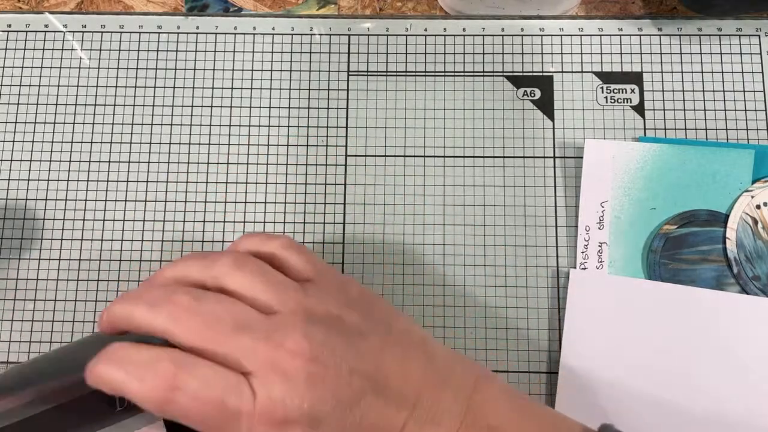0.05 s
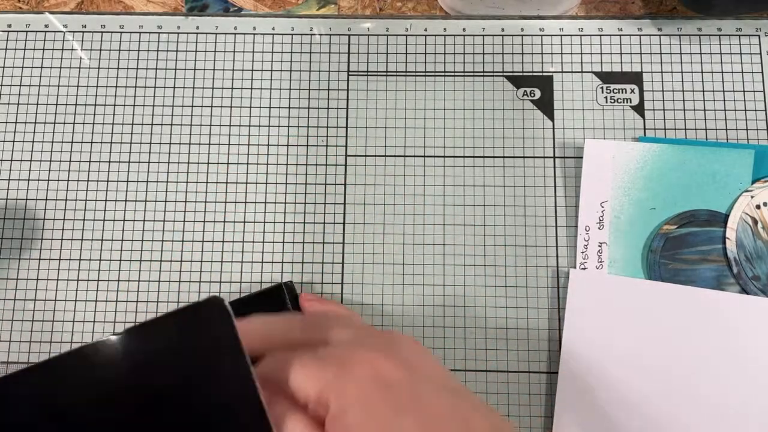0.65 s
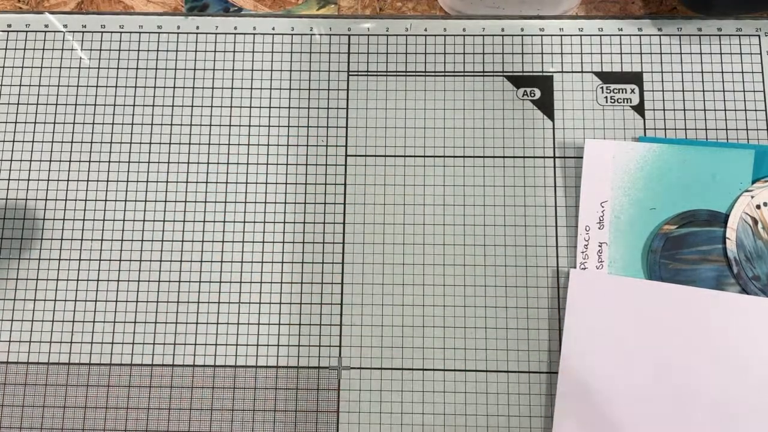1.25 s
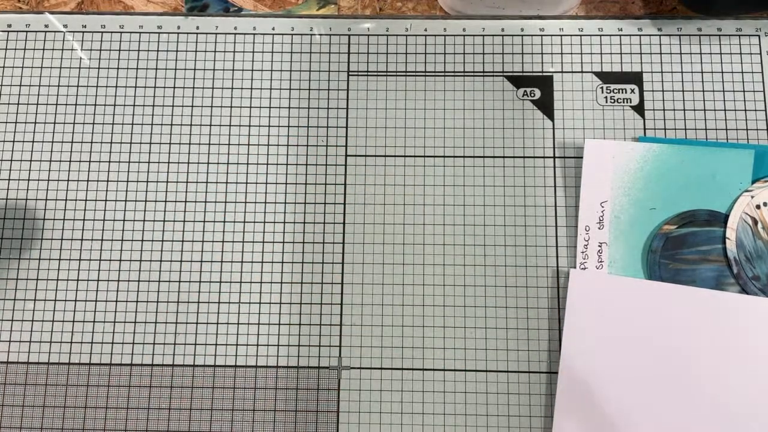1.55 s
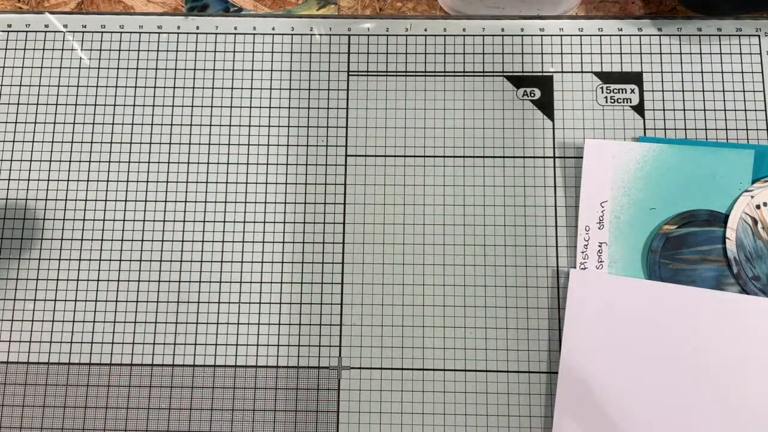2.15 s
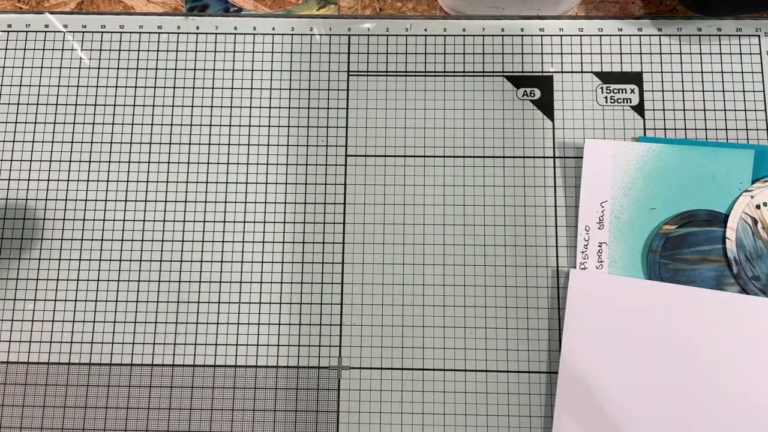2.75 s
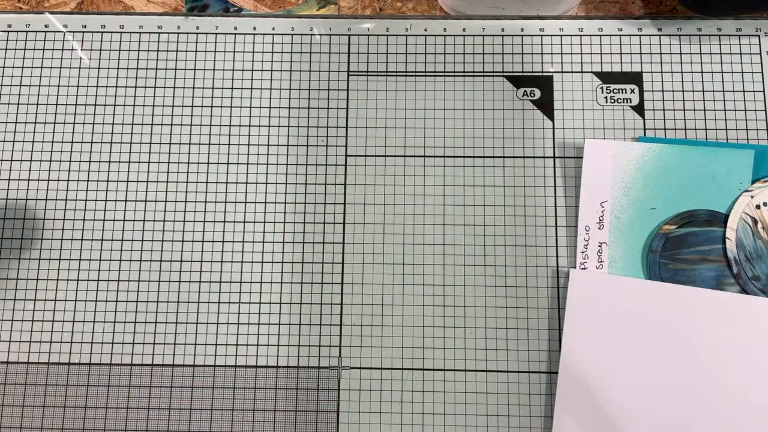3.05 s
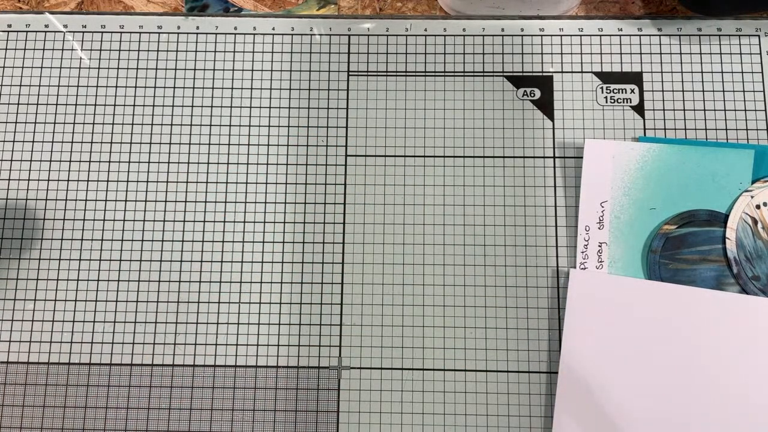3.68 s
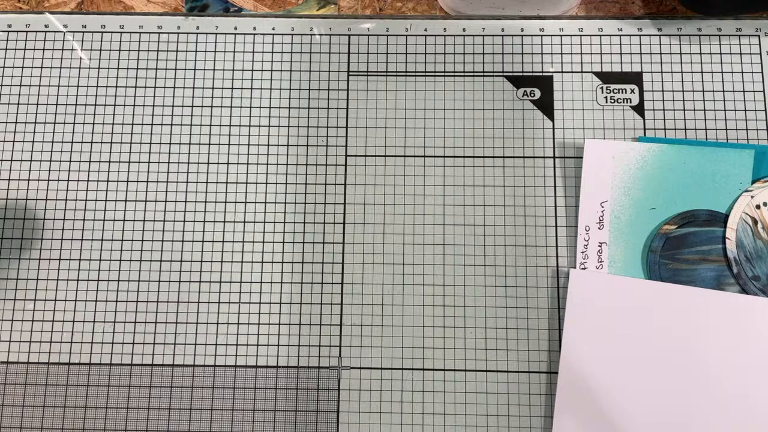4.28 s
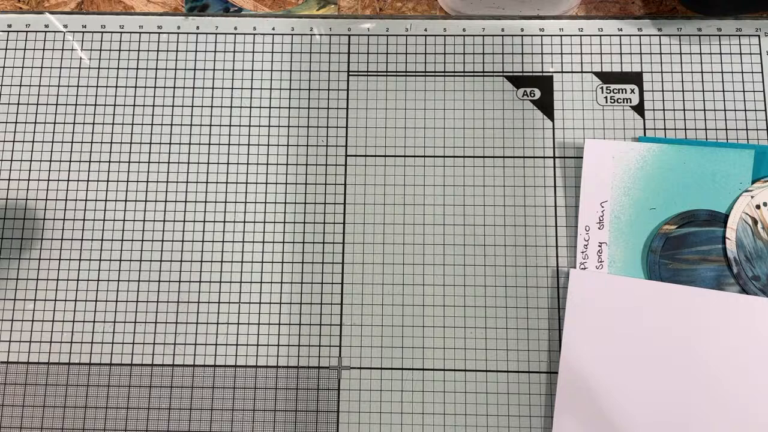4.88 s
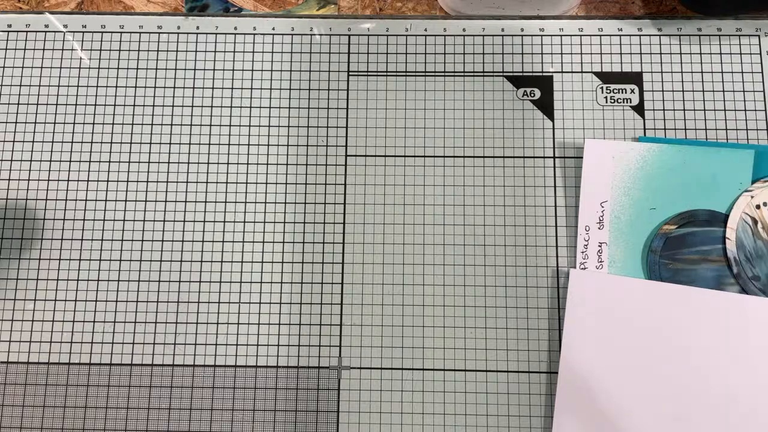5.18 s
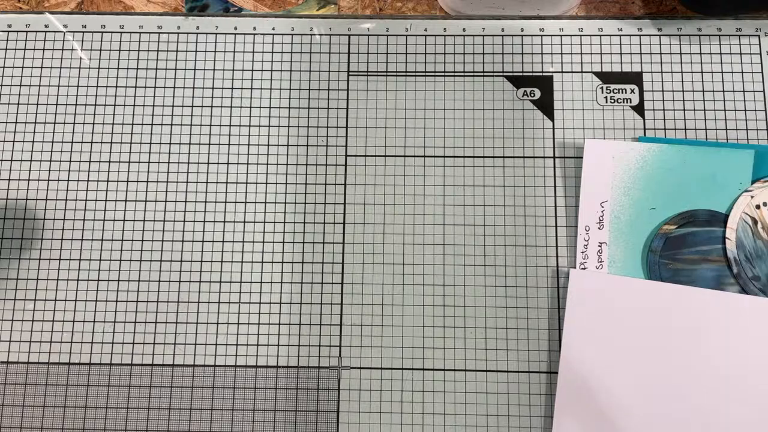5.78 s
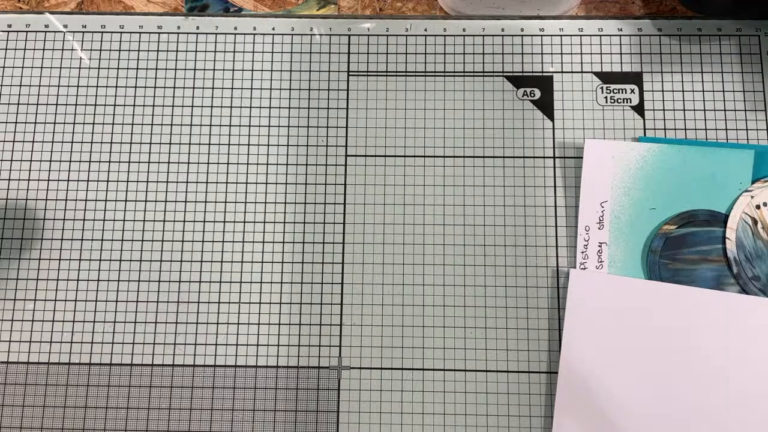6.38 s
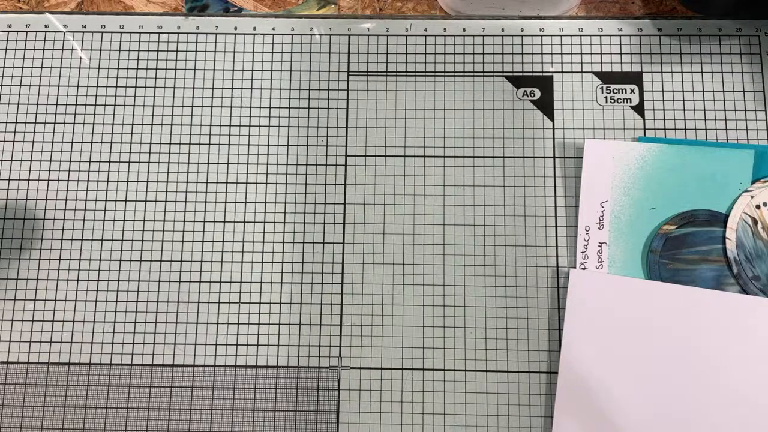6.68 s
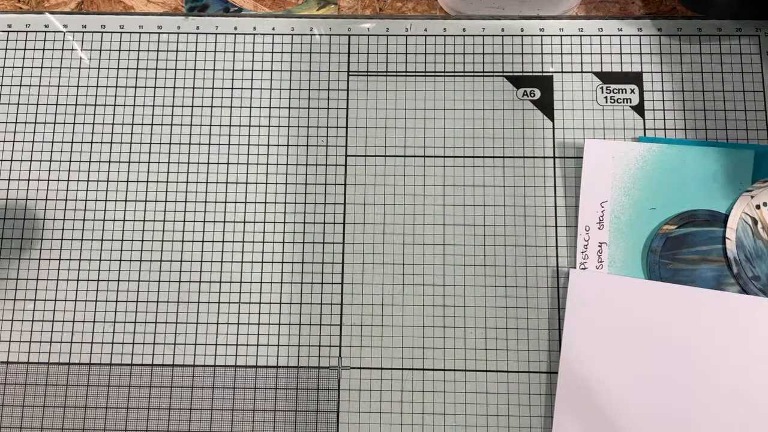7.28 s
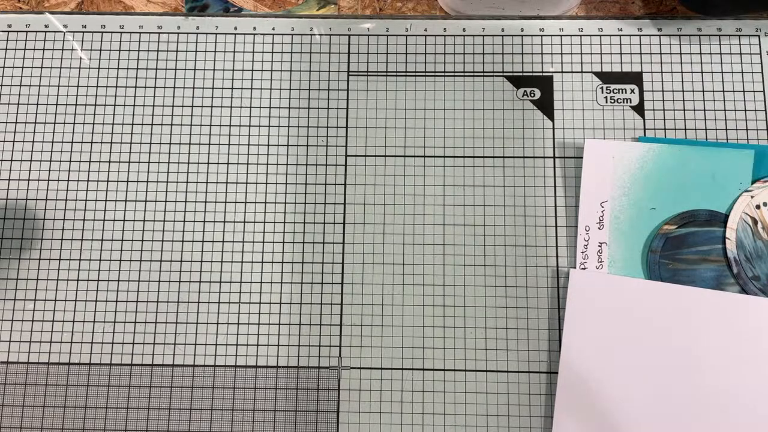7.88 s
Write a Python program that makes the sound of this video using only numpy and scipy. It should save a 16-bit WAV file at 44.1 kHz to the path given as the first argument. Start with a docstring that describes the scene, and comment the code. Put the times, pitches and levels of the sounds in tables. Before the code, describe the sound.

Close table thumps and sharp plastic clicks from a case being unlatched, followed by light crinkling and sliding of paper and packaging.

```python
"""A plastic case scuffs and ticks as it slides off a cutting mat; then it is unlatched and handled.
Its edges and catches snap as stiff plastic lets go, and the hollow shell rings. Paper and packaging
hiss by friction, crinkle by buckling and rasp by stick-slip. Bumps set the craft table's top vibrating,
and swung things push the air aside. A small room answers the loud snaps, over a faint mains hum."""
import sys
import numpy as np
from scipy import signal
from scipy.fft import rfft, irfft, next_fast_len
from scipy.io import wavfile

SR = 44100
rng = np.random.default_rng(int(sys.argv[2]) if len(sys.argv) > 2 else 0)


def inscribe(sig):
    """Save sig as 16-bit PCM at rate SR to the path in sys.argv[1].

    A 1-D sig is mono; a 2-D sig holds one channel per row.
    Samples are clipped to [-1, 1] before scaling.
    """
    pcm = np.round(np.clip(np.atleast_2d(sig).T, -1, 1) * 32767)
    wavfile.write(sys.argv[1], SR, pcm.astype(np.int16))


N = 354334
TIME = np.arange(N) / SR

# The body, middle and treble bands. Each row: lower and upper edge in Hz.
BANDS = [(250, 900), (900, 3500), (3500, 17000)]
# Spectrum of the shaken table top. Each row: frequency in Hz, level in dB.
RUMBLE = [(30, -33), (58, -18), (85, -4), (125, 0), (200, -8), (373, -20), (508, -23.5), (780, -47),
          (1320, -120)]
# The room's share grows as the hands move off the microphone. Each row: time in seconds, send in dB.
ROOM_SEND = [(0.3, -22.5), (1.2, -12), (1.7, -8), (2.05, -18), (2.73, -4.5), (3.1, 2), (3.8, -0.5),
             (5.5, -4.5), (5.8, -11.5)]


def gain_of(db):
    """Converts decibels to an amplitude ratio."""
    return 10 ** (np.asarray(db) / 20)


def unit_rms(x):
    """Normalises a signal to rms 1."""
    return x / np.sqrt(np.mean(x ** 2) + 1e-20)


def read(points, hz):
    """Interpolates a table on a log-frequency axis."""
    f, value = np.transpose(points)
    return np.interp(np.log(hz + 1), np.log(f + 1), value)


def add(mix, s, sound):
    """Superposes a sound on the mix at s seconds."""
    part = mix[max(round(s * SR), 0):][:len(sound)]
    part += sound[:len(part)]


def coloured(x, colour, band=None, order=4):
    """Filters x by a spectral envelope, optionally within one band, to rms 1."""
    size = next_fast_len(len(x))
    envelope = gain_of(read(colour, np.fft.rfftfreq(size, 1 / SR)))
    x = irfft(rfft(x, size) * envelope, size)[:len(x)]
    if band:
        x = signal.sosfilt(signal.butter(order, band, "band", fs=SR, output="sos"), x)
    return unit_rms(x)


def wobble(rate_hz):
    """Random modulation of rms 1 that turns rate_hz times a second."""
    return unit_rms(np.interp(TIME * rate_hz, np.arange(4000), rng.standard_normal(4000)))


def resonant(x, hz, q):
    """A second-order resonator with peak gain 1."""
    return signal.lfilter(*signal.iirpeak(min(hz, SR / 2.5), max(q, 1), fs=SR), x)


def ring(modes, tilt_db=0, free=1):
    """Free decay of modes: a harder blow tilts them upward, a resting hand damps them."""
    t = TIME[:SR // 2]
    centre = np.mean([np.log2(hz) for hz, _, _ in modes])
    return sum(gain_of(db + tilt_db * (np.log2(hz) - centre) - 60 * t / (t60 * free))
               * np.sin(2 * np.pi * hz * t) for hz, db, t60 in modes)


def speed_of(s, rise_s, fall_s):
    """A Gaussian rise and fall of speed, reaching 1 at s seconds."""
    return np.exp(-((TIME - s) / np.where(TIME < s, rise_s, fall_s)) ** 2 / 2)


def contacts(attack_s=0.015, sag_db=-2, release_s=0.016, touch_body_db=-2.5, touch_crinkle=0.16):
    """Incoherent sources add in power. Returns friction power per band and the share that crinkles."""
    # Light finger contact. Each row: time in seconds, middle band in dB, treble in dB above it.
    touch = [(0, -64, -2.5), (0.45, -66, 2.5), (0.7, -56, 2), (0.9, -56, -6), (1.35, -61, 4.5),
             (2.3, -58.5, 3), (2.68, -68.5, 0), (3.05, -64.5, -12.5), (3.2, -57, -5), (3.55, -68, 5.5),
             (4.2, -65.5, -1.5), (4.5, -71, -5.5), (4.851, -76.5, 5), (5.0, -72.5, -8.5), (5.6, -65, 6),
             (6.62, -63, -10), (6.85, -66, -7.5), (6.95, -88, -6.5)]
    # Paper or plastic sliding. Each row: start and length in seconds, middle band in dB,
    # body and treble in dB above it, crinkle share from 0 to 1.
    strokes = [(0.025, 0.2, -47, -6, -2, 0.2), (0.116, .042, -29.5, -12.5, -7, 0.06),
               (0.272, 0.1184, -44.5, 0.5, 4, 0.4), (0.583, 0.1006, -45.5, -0.5, -5.5, 0.4),
               (0.989, 0.13, -49.5, 1, 2.5, 0.12), (1.162, 0.12, -51, 0, -2, .4),
               (1.38, 0.36, -52.5, -7, 1, 0.2), (1.465, .075, -42.5, -13, -1, 0),
               (2.364, .11, -51, -8, -6, 0.1), (2.485, .06, -44, -1.5, -2, 0),
               (3.106, .06, -53, 0.5, -7.5, 0), (3.586, 0.15, -56, -5.5, 1, 0),
               (3.806, .055, -52, 6, -1.5, 0.1), (4.095, 0.24, -65, -14.5, 2, 0.1),
               (5.046, 0.065, -57, 5, -11, .05), (5.328, 0.057, -50, -1, -8.5, 0.1),
               (5.786, .105, -43.5, 4.5, -8.5, 0.1), (5.989, .2, -46, -6.5, 0, .16),
               (6.2, 0.11, -51.5, -3, 4.5, 0.12), (6.305, .28, -56, -2, -6, 0.35),
               (7.033, 0.077, -57, -1, -5.5, 0.5), (7.083, 0.2283, -51, -0.5, -5, 0.2),
               (7.306, .07, -65, -1, 4, 0.4), (7.579, 0.043, -75, -7, 7, .3),
               (7.811, .07, -72, -21.5, 1, 0.2)]
    s, db, treble_db = np.transpose(touch)
    power = np.array([gain_of(np.interp(TIME, s, db + band_db)) ** 2
                      for band_db in (touch_body_db, 0, treble_db)])
    crinkle_power = touch_crinkle * power[1]
    t = TIME[:SR]
    for s, length, db, body_db, treble_db, crinkle in strokes:
        hold = gain_of(db + sag_db * np.minimum(t / length, 1))
        push = np.minimum(t / attack_s, 1) * hold * np.exp(-np.maximum(t - length, 0) / release_s)
        for band, band_db in zip(power, (body_db, 0, treble_db)):
            add(band, s, (push * gain_of(band_db)) ** 2)
        add(crinkle_power, s, crinkle * push ** 2)
    return power, np.clip(crinkle_power / power[1], 0, 1)


def crinkles(grains_per_s=420, facet_q=3, pitches=14, pool=4000):
    """Buckling: tiny facets of a sheet give way at random, each exciting a resonance."""
    out = np.zeros(N)
    grains = int(grains_per_s * N / SR / pitches)
    for hz in np.geomspace(600, 14000, pitches):
        onsets = rng.integers(0, N, pool)[:grains]
        sizes = gain_of(4 * np.minimum(rng.exponential(1, pool), 3)) * rng.choice([-1, 1], pool)
        out += resonant(np.bincount(onsets, sizes[:grains], N), hz, facet_q)
    return out


def sliding(flutter_db=3.0, patchy_db=1.5, drag_db=-7):
    """Sliding friction: a smooth hiss mixed with crinkles, while the drag shakes the table top."""
    power, share = contacts()
    contact = np.sqrt(share) * unit_rms(crinkles()) + np.sqrt(1 - share) * rng.standard_normal(N)
    # Friction spectrum. Each row: frequency in Hz, level in dB.
    spectrum = [(120, -40), (200, -4), (334, -0.5), (590, -1.5), (709, -6), (986, -0.5), (1400, 2.5),
                (2510, -0.5), (3490, -7.5), (5420, -5.5), (7680, -11), (8500, -7.5), (16000, -17.5)]
    rub = sum(level * gain_of(patchy_db * wobble(50)) * coloured(contact, spectrum, band)
              for band, level in zip(BANDS, np.sqrt(power)))
    # sticking and slipping makes all bands flutter together
    grip = gain_of(flutter_db * np.sqrt(2 * share) * wobble(190))
    drag = np.sqrt(power[0]) * gain_of(drag_db) * coloured(rng.standard_normal(N), RUMBLE)
    return grip * rub + drag


def air_and_hum(air_db=-74, hum_hz=120, waver_db=0.58):
    """Noise floor: room air and steady mains hum, heard louder and softer as noise suppression shifts."""
    # Spectrum of the air. Each row: frequency in Hz, level in dB.
    spectrum = [(24, -47.5), (40, -20.5), (64, -15.5), (91, -11), (133, -8), (189, -10.5), (290, -16),
                (680, -26.5), (1210, -28.5), (1900, -36), (16000, -40)]
    # The hum as heard. Each row: time in seconds, level in dB.
    heard_level = [(3.3, -68), (4.3, -73), (6.75, -64.5), (7.3, -72.5)]
    hum = np.sqrt(2) * np.sin(2 * np.pi * hum_hz * TIME)
    hum_db = np.interp(TIME, *np.transpose(heard_level)) + waver_db * wobble(6)
    return gain_of(air_db) * coloured(rng.standard_normal(N), spectrum) + gain_of(hum_db) * hum


def beamed(x, send_db, neutral_send_db=-10.5, growth=0.073):
    """Directivity: a snap beams its top octave, so a near one is bright and a far one duller."""
    top_db = max(growth * (neutral_send_db - send_db), -2)
    shelf = gain_of(read([(8000, 0), (13000, top_db)], np.fft.rfftfreq(len(x), 1 / SR)))
    return irfft(rfft(x) * shelf, len(x))


def clicks(rise_s=0.00027, shiver_db=-26, shiver_s=0.017, pulse_share=0.086, panel_q=8, overtone=2.4):
    """Elastic release: a plastic snap is a pulse, a damped crack and a shiver. Returns direct, send."""
    # Each row: start in seconds, middle band in dB as if spread over 5 ms, body and treble in dB
    # above it, resonance in Hz, decay in seconds. All are ticks and snaps except the row at 2.7255 s,
    # a faint smear of noise just before and around the loud snap at 2.73 s.
    transients = [(0.0734, -54, -0.5, 17.5, 14300, 0.00049), (0.2666, -40.5, -7.5, 7.5, 5170, 0.00425),
                  (0.2784, -27.5, -9, 0.5, 5500, 0.00644), (0.2899, -38, 2, 4.5, 9350, 0.00142),
                  (0.3212, -31, -9, 3.5, 4980, 0.00117), (0.3238, -28.5, -7.5, 4, 13680, 0.0023),
                  (0.3644, -41.5, -14, 4.5, 13800, 0.0023), (0.3895, -42.5, -16.5, 0, 1005, 0.0036),
                  (0.5471, -34, -7.5, 2, 13600, 0.00275), (0.6322, -40.5, -12.5, -12.5, 1790, 0.0025),
                  (0.6522, -35, -3.5, -1.5, 865, 0.0018), (0.9725, -48.5, -6, -1.5, 3000, 0.00136),
                  (1.0064, -46, -3, -1, 5060, 0.0029), (1.1138, -44.5, -15, 6, 10630, 0.0024),
                  (1.1798, -37.5, -8, -13, 1244, 0.00091), (1.2015, -42, -12, -1, 4650, 0.0013),
                  (1.2389, -44.5, 0.5, 2.5, 3350, 0.00345), (1.3701, -33.5, -12.5, -1, 5230, 0.0029),
                  (1.688, -24.5, -6.5, 2.5, 1050, 0.00476), (1.7102, -21, -10.5, 0.5, 2758, 0.0048),
                  (1.8512, -37.5, -5.5, 10, 10900, 0.00264), (1.961, -36, -6, 5, 10860, 0.00183),
                  (2.0626, -47.5, -18, 13, 1150, 0.00204), (2.0719, -38, -12.5, 5.5, 10240, 0.00153),
                  (2.0763, -31.5, -11, -1, 1500, 0.00266), (2.0795, -22.5, -16.5, -2.5, 6720, 0.0019),
                  (2.0846, -31.5, -9, 1, 1300, 0.0034), (2.2227, -41.5, -8.5, 3, 472, 0.0128),
                  (2.3192, -41, -6.5, 3, 484, 0.00265), (2.5092, -31, -9, -1.5, 7630, 0.0033),
                  (2.7255, -33.5, -18, 2.5, 2500, 0.027), (2.7312, -20, -11.5, -0.5, 2400, 0.00222),
                  (3.1119, -47, 1, -21.5, 540, 0.0084), (3.797, -53, 5, 9, 2500, 0.0054),
                  (3.8029, -35, -6.5, 3, 5700, 0.0051), (5.3233, -43, -11.5, 2.5, 3520, 0.0066),
                  (5.3835, -46, -2.5, -24, 610, 0.0061), (5.5194, -40, 2.5, -28, 560, 0.0116),
                  (5.6928, -49.5, -25, -0.5, 3760, .0055), (5.7505, -39, -9.5, -9, 2045, 0.0033),
                  (5.7565, -40, -12.5, -9, 2300, 0.00274), (5.7896, -34, -12, 5, 1010, 0.00316),
                  (5.813, -27.5, -1.5, -14, 941, 0.0051), (5.818, -25.5, -5, -2.5, 930, 0.0045),
                  (5.854, -33.5, -12, 3.5, 1153, 0.012), (5.8855, -37.5, -2.5, -3.5, 1150, 0.0039),
                  (5.9698, -34, -1, -10, 3520, 0.0086), (6.059, -42.5, -21, 1, 960, 0.0013),
                  (6.3129, -45.5, -6, 1.5, 9400, 0.0035), (6.3407, -43.5, -4.5, -2.5, 1060, 0.0039),
                  (6.5288, -46, -10, -17, 2210, 0.0011), (7.1641, -38, -24, -5.5, 1510, 0.0046),
                  (7.1738, -37, -23.5, 4, 13700, 0.00196), (7.2433, -40, -3.5, -9.5, 1110, 0.009),
                  (7.4104, -54, -7, -4.5, 810.4, 0.0074), (7.4691, -59.5, -7.5, -5.5, 946, 0.0025),
                  (7.8205, -61.5, -31.5, 3, 3400, 0.0032)]
    # Spectrum of a snap. Each row: frequency in Hz, level in dB.
    spectrum = [(250, -4.5), (450, -8), (1000, -1.5), (2300, -3), (3600, -5), (5500, -0.5), (8000, -2),
                (11000, -6.5), (16000, -14.5)]
    t = TIME[:SR // 12]
    spread = np.sqrt(0.005 * SR)
    stretches = (1.5, 1, 0.91)  # low modes start later and last longer than high ones
    direct, send = np.zeros(N), np.zeros(N)
    kick = signal.unit_impulse(len(t), 24)
    pulses = [coloured(kick, spectrum, band) / np.sqrt(len(t)) for band in BANDS]
    textures = [coloured(rng.standard_normal(N), spectrum, band) for band in BANDS]
    shiver = gain_of(shiver_db) * np.exp(-t / shiver_s)
    for k, (s, db, body_db, treble_db, hz, decay_s) in enumerate(transients):
        snap, feed = np.zeros(len(t)), np.zeros(len(t))
        send_db = np.interp(s, *np.transpose(ROOM_SEND))
        for pulse, texture, band_db, stretch in zip(pulses, textures, (body_db, 0, treble_db), stretches):
            attack = 1 - np.exp(-t / (rise_s * stretch))
            decay = np.exp(-t / (decay_s * stretch)) + shiver
            burst = texture[k * len(t):][:len(t)] * attack * decay
            crack = np.sqrt(pulse_share) * pulse + np.sqrt(1 - pulse_share) * burst / np.linalg.norm(burst)
            snap += gain_of(band_db) * crack / np.linalg.norm(crack)
            # summed over all directions the spectrum is smooth, so the room is fed the plain pulse
            feed += gain_of(band_db + send_db) * pulse
        # the struck panel lifts its own resonance and one overtone
        for mix, sound, lift_db in ((direct, beamed(snap, send_db), 5), (send, feed, -3)):
            panel = resonant(sound, hz, panel_q)
            panel += gain_of(-9) * resonant(sound, hz * overtone, panel_q * overtone)
            add(mix, s, gain_of(db) * spread * (sound + gain_of(lift_db) * panel))
    return direct, send


def room(x, build_s=0.0021):
    """Reverberation: a diffuse tail builds quickly and each band decays at its own rate."""
    # Each row: frequency in Hz, reverberation time in seconds.
    decay_times = [(150, 0.8), (600, 0.28), (1500, 0.352), (15000, 0.33)]
    hz, t, noise = signal.stft(rng.standard_normal(SR * 3 // 4), SR, nperseg=256)
    decay = gain_of(-60 * t / read(decay_times, hz)[:, None])
    _, tail = signal.istft(noise * decay, SR, nperseg=256)
    tail *= 1 - np.exp(-(TIME[:len(tail)] / build_s) ** 2)
    return signal.fftconvolve(x, tail / np.linalg.norm(tail))[:N]


def table_top(contact_s=0.007, rumble_db=-2):
    """Damped plate modes: the softer a bump, the slower they build. Things being moved add rumble."""
    # Each row: start in seconds, level in dB, hardness as tilt in dB per octave,
    # share of the free ring time that the hand leaves.
    bumps = [(0.359, -23, -3.5, 0.323), (0.445, -42.5, 5.5, 0.347), (0.85, -30.5, 4.5, 0.175),
             (0.877, -24.5, 8.5, 0.17), (0.953, -37.5, 5, 0.194), (1.251, -42.5, 5.5, 0.37),
             (1.379, -40.5, 7.5, 0.26), (2.325, -39.5, 2.5, 0.202), (2.738, -42, 11, 0.28),
             (3.802, -36, 6.5, 0.73), (3.83, -39.5, 1, 0.69), (5.327, -45, 12.5, 0.67),
             (5.389, -42, 4.5, 0.36), (5.529, -47.5, 6, 1), (5.975, -35, -2.5, 0.342)]
    # Each row: frequency in Hz, level in dB, time to fall 60 dB in seconds.
    modes = [(74, -17, 0.1), (106, -6.5, 0.22), (120.7, 5, 0.37), (141.2, 1.5, 0.28), (194, -4, 0.29),
             (340.2, -14.5, 0.26)]
    # One list a move. Each row: time in seconds, level in dB.
    moves = [
        [(.745, -37), (.78, -33), (.88, -39), (.91, -48.5), (1.12, -66.5)],
        [(7.06, -55.5), (7.095, -41.5), (7.16, -58.5), (7.27, -42.5), (7.36, -79)],
    ]
    out = np.zeros(N)
    for s, db, tilt_db, free in bumps:
        thud = ring(modes, tilt_db, free)
        attack = 1 - np.exp(-(TIME[:len(thud)] * gain_of(tilt_db) / contact_s) ** 2)
        add(out, s, gain_of(db) * thud * attack)
    rumble = coloured(rng.standard_normal(N), RUMBLE)
    for move in moves:
        s, db = np.transpose(move)
        out += rumble * gain_of(np.interp(TIME, s, db + rumble_db, left=-120, right=-120))
    return out


def swings(gust_hz=74, gust_q=3.5):
    """Flow noise: a swung thing whooshes with its speed, and the air it pushes buffets the microphone."""
    # Each row: fastest moment in seconds, whoosh in dB, rise and fall in seconds, gust in dB.
    movements = [(0.81, -52.5, 0.051, 0.085, -33), (5.01, -49, 0.127, 0.18, -39.5)]
    # Spectrum of the whoosh. Each row: frequency in Hz, level in dB.
    spectrum = [(100, 1.5), (280, 4.5), (600, -0.5), (900, -11), (1800, -14), (4000, -43), (16000, -63)]
    whoosh = coloured(rng.standard_normal(N), spectrum)
    gust = resonant(rng.standard_normal(N), gust_hz, gust_q)
    gust = unit_rms(resonant(gust, gust_hz, gust_q))
    out = np.zeros(N)
    for s, db, rise_s, fall_s, gust_db in movements:
        speed = speed_of(s, rise_s, fall_s)
        out += gain_of(db) * speed ** 2 * whoosh + gain_of(gust_db) * speed ** 5 * gust
    return out


def bending_waves(low_cut_hz=80, room_db=-14):
    """Dispersion: high bending waves outrun low ones, so a tap on the table arrives as a falling chirp."""
    # Each row: start in seconds, peak in dB, delay at 250 Hz in seconds, upper cutoff in Hz.
    taps = [(0.7686, -22, 0.008, 337), (0.792, -22, 0.00528, 200), (0.818, -27.5, 0.0075, 380),
            (1.709, -30.5, 0.007, 210), (1.849, -40, 0.006, 421.7), (1.9595, -39, 0.006, 420)]
    size = SR // 8
    hz = np.fft.rfftfreq(size, 1 / SR)
    out = np.zeros(N)
    for s, db, lag_s, top_hz in taps:
        dispersion = np.exp(-4j * np.pi * lag_s * np.sqrt(250 * hz))
        passband = hz ** 2 / (hz ** 2 + low_cut_hz ** 2) / (1 + (hz / top_hz) ** 4)
        chirp = irfft(dispersion * passband, size)
        add(out, s, gain_of(db) * chirp / abs(chirp).max())
    return out + gain_of(room_db) * room(out)


def rasps(stutter_db=4.5, rasp_db=-1):
    """Uneven stick-slip at a sheet's edge drives one broad resonance, pitched by its free length."""
    # One list a stroke. Each row: time in seconds, pitch in Hz, level in dB.
    strokes = [
        [(1.52, 2500, -52.5), (1.57, 3083, -51.5), (1.65, 4210, -49.5)],
        [(2.43, 1559, -43.5), (2.49, 1441, -58.5)],
        [(4.05, 1964, -69), (4.45, 1792, -68.5), (4.68, 1640, -77)],
        [(6.0, 1045, -45), (6.08, 880, -48), (6.14, 1090, -49.5), (6.2, 998, -52.5)],
        [(5.19, 2673, -76), (5.31, 3053, -60.5)],
        [(6.1, 3100, -49.5), (6.2, 2526, -55)],
    ]
    out = np.zeros(N)
    for stroke in strokes:
        s, hz, db = np.transpose(stroke)
        on = (TIME >= s[0]) & (TIME <= s[-1])
        lowpass = signal.butter(2, hz.mean() / 10, fs=SR, output="sos")
        shake = signal.sosfilt(lowpass, rng.standard_normal(N) + 1j * rng.standard_normal(N))[on]
        carrier = np.exp(2j * np.pi * np.cumsum(np.interp(TIME[on], s, hz)) / SR)
        slips = gain_of(stutter_db * wobble(90)[on]) * signal.windows.tukey(on.sum(), 0.1)
        level = gain_of(np.interp(TIME[on], s, db) + rasp_db)
        out[on] += level * unit_rms((shake * carrier).real * slips)
    return out


def hollow_case(ring_db=-11, low_cut_hz=700):
    """Free vibration: the case rings on after its catches snap, too small to radiate bass."""
    # Each row: start in seconds, level in dB.
    blows = [(2.0791, -7.5), (2.0875, -14.5)]
    # Each row: frequency in Hz, level in dB, time to fall 60 dB in seconds.
    modes = [(781, -9.5, 0.018), (998, -3, 0.018), (1309.5, 4.5, 0.02), (1520, 3, 0.02), (1670, -5, 0.024),
             (2250, -4.5, 0.011)]
    out = np.zeros(N)
    for s, db in blows:
        add(out, s, gain_of(db + ring_db) * ring(modes))
    return signal.sosfilt(signal.butter(3, low_cut_hz, "high", fs=SR, output="sos"), out)


def swishes(flutter_db=3.0):
    """Light friction: smooth paper on paper hisses in the top octave, growing as speed squared."""
    # Each row: fastest moment in seconds, level in dB, rise and fall in seconds.
    glides = [(3.18, -58, 0.016, 0.0235), (3.74, -59.5, 0.13, 0.127), (4.315, -68, 0.017, .03),
              (4.85, -74.5, 0.18, 0.0405), (5.47, -67, 0.0241, 0.15)]
    # Each row: frequency in Hz, level in dB.
    spectrum = [(2000, -24), (7000, -8.5), (8500, 1), (16000, -10)]
    level = sum(gain_of(db) * speed_of(s, rise_s, fall_s) ** 2 for s, db, rise_s, fall_s in glides)
    return level * gain_of(flutter_db * wobble(60)) * coloured(rng.standard_normal(N), spectrum)


def judder(start_s=6.211, end_s=6.39, slip_s=0.0013, uneven=0.0922):
    """Nearly periodic stick-slip: each slip of a dragged edge rings the sheet, never quite alike."""
    slips_per_s, ring_hz, t60_s, db = 49, 1021, 0.0023, -32.5
    out, s = np.zeros(N), start_s
    for gap, pitch, size in rng.standard_normal((20, 3)):
        if s < end_s:
            slip = ring([(ring_hz * (1 + uneven * pitch / 2), db + size, t60_s)])
            add(out, s, slip * (1 - np.exp(-TIME[:len(slip)] / slip_s)))
        s += (1 + uneven * gap) / slips_per_s
    return out


def scene(slide_db=-1, click_room_db=-1, rustle_room_db=-12, case_room_db=-9, table_room_db=-9):
    """Superposition: the direct sound of close handling, the room's answer and the noise floor."""
    snaps, snap_send = clicks()
    rustle = gain_of(slide_db) * sliding() + rasps() + judder() + swishes() + swings()
    hollow, thuds = hollow_case(), table_top()
    send_db = np.interp(TIME, *np.transpose(ROOM_SEND))
    reverb = room(gain_of(click_room_db) * snap_send + gain_of(rustle_room_db) * rustle
                  + gain_of(case_room_db) * hollow + gain_of(table_room_db + send_db) * thuds)
    return (snaps + rustle + hollow + thuds + bending_waves() + reverb + air_and_hum())[None]


def record(dry, low_cut_hz=51, top_hz=16300):
    """Band limiting: the microphone drops the deep bass, and a steep low-pass the highest treble."""
    x = signal.sosfilt(signal.butter(9, low_cut_hz, "high", fs=SR, output="sos"), dry)
    lowpass = signal.firwin(511, top_hz, window=("kaiser", 9), fs=SR)
    return signal.oaconvolve(x, lowpass[None], "same")


dry = scene()
out = record(dry)
inscribe(out)
```